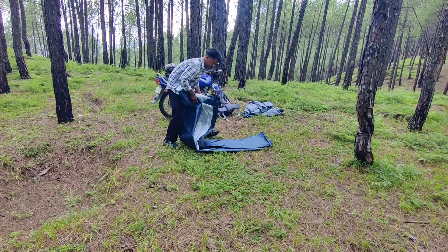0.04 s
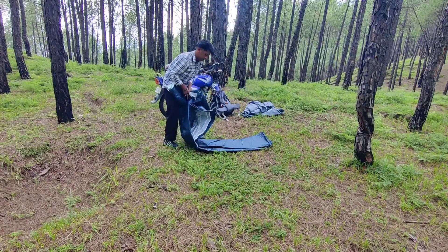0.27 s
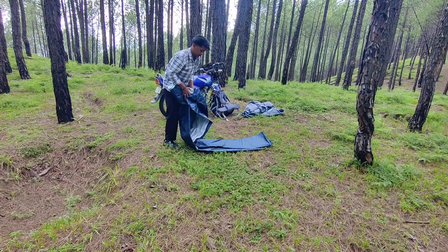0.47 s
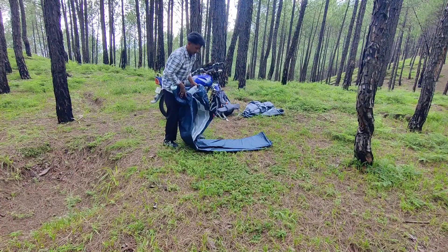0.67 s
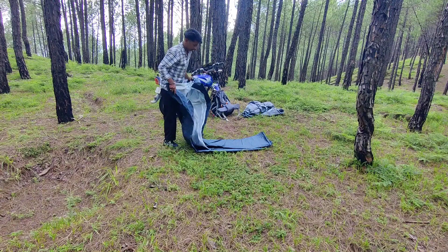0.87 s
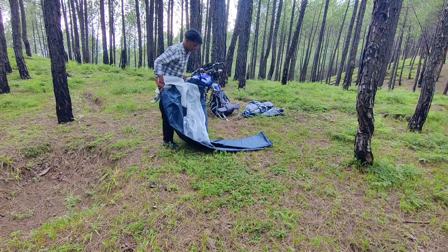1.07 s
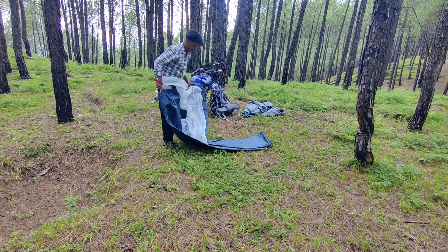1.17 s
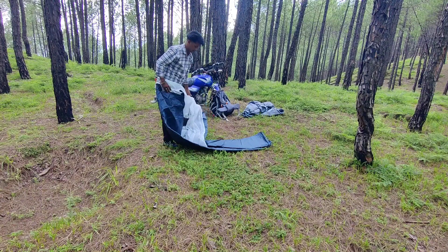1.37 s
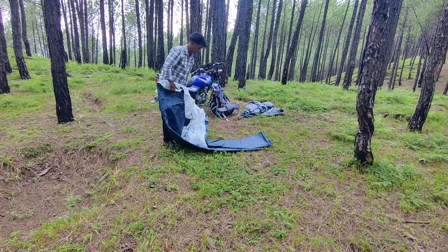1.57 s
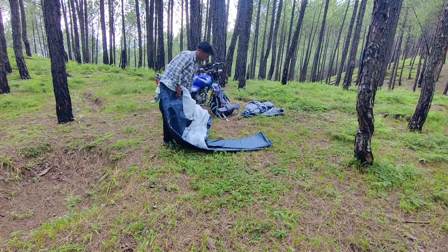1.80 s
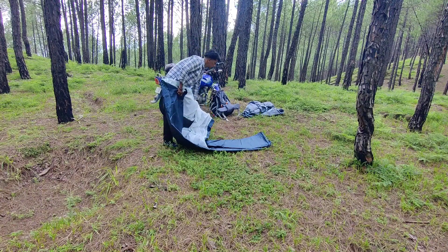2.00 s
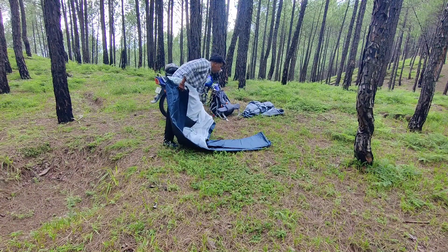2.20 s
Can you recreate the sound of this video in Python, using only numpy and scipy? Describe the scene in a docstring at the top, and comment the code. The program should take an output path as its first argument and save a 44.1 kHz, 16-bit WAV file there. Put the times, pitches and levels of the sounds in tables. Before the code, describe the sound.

Nylon tent fabric rustles faintly for 0.2 s, then pulls taut in a dull, low flap at about 0.25 s. Crumpling, cloth hiss and sharp crease snaps follow, swelling to their fullest around 0.9-1.0 s with low puffs of pushed air. It thins after 1.5 s, nearly silent by 1.7 s, leaving tiny crinkles to the end. Close, slightly left, dry outdoors, with very faint steady woodland air.

```python
"""A nylon tent is lifted and shaken out over grass in a pine wood.
The sheet flaps taut once, then slides and crumples in a long swell and settles into a few small crinkles.
Its folds buckle in dense tiny random clicks, the cloth hisses over itself, and single creases snap.
Its panels push air in low billows of filtered noise; faint steady air among the trees lies behind."""
import sys
import numpy as np
from scipy import signal
from scipy.fft import rfft, irfft, next_fast_len
from scipy.io import wavfile
from scipy.ndimage import map_coordinates

SR = 44100
rng = np.random.default_rng(int(sys.argv[2]) if len(sys.argv) > 2 else 0)


def dump_mix(stems):
    """Bounce the given channels to the path in sys.argv[1] as a 16-bit WAV at rate SR."""
    frames = np.atleast_2d(stems).T  # one column per channel
    limited = np.clip(frames, -1, 1)  # hard clip at full scale
    pcm = np.round(limited * 32767).astype(np.int16)
    wavfile.write(sys.argv[1], SR, pcm)


N = 99225  # length of the scene in samples


def amp(db):
    """Turn decibels into a gain."""
    return 10 ** (np.asarray(db) / 20)


def unit(x):
    """Scale to an rms (average strength) of 1."""
    return x / np.sqrt(np.mean(x ** 2) + 1e-20)


def along(points, hz):
    """Read a (frequency, value) table at any pitch, with straight lines on a log frequency axis."""
    table_hz, values = np.transpose(points)
    return np.interp(np.log(hz + 1), np.log(table_hz + 1), values)


def curve(rows):
    """Read a (time, value) table at every sample."""
    return np.interp(np.arange(N) / SR, *np.transpose(rows))


def wobble(rate):
    """A smooth random curve through rate random points a second."""
    knots = rng.standard_normal(N // 20)
    return map_coordinates(knots, [np.arange(N) * rate / SR], mode="wrap")


def filtered(x, response):
    """Change the strength and timing of each frequency by a complex response."""
    padded = 2 * next_fast_len(N)
    hz = np.fft.rfftfreq(padded, 1 / SR)
    return irfft(rfft(x, padded) * response(hz), padded)[..., :N]


def coloured(x, points):
    """Give a sound a tone colour that never rings ahead of time and keeps the power of white noise."""
    def response(hz):
        # folding the cepstrum forward in time gives the filter its minimum phase
        cepstrum = irfft(np.log(unit(amp(along(points, hz)))))
        half = len(cepstrum) // 2
        cepstrum[1:half] *= 2
        cepstrum[half + 1:] = 0
        return np.exp(rfft(cepstrum))
    return filtered(x, response)


def buckles(per_s, spread_db):
    """Tiny clicks of random time, sign and size; sparse ones are made stronger to keep the power even."""
    chance = np.minimum(per_s / SR, 1)
    size_db = spread_db * np.clip(rng.standard_normal(N), -2, 2)
    sign = np.sign(rng.standard_normal(N))
    clicks = (rng.random(N) < chance) * amp(size_db) * sign
    return unit(clicks / np.sqrt(chance))


SPRAY_S = 0.0023  # the energy of the scatter after each click fades over this time


def sprayed(clicks):
    """Three rows: the clicks, then the noisy spray of reflections after each, for left and right."""
    keep = np.exp(-1 / (SPRAY_S * SR))
    energy = signal.lfilter([1 - keep], [1, -keep], clicks ** 2)
    spray = np.sqrt(np.abs(energy)) * rng.standard_normal((2, N))
    return np.vstack([clicks, spray])


# how hard the cloth is worked: (time [s], level [dB])
HANDLING = [(0, -51.5), (.045, -56), (.08, -56.5), (.11, -59.5), (.14, -58), (.21, -58), (.255, -38),
            (.33, -44), (.425, -47), (.47, -41.5), (.51, -45.5), (.6, -47.5), (.645, -45.5), (.69, -46.5),
            (.735, -43.5), (.78, -42), (.85, -39), (.915, -37.5), (.99, -37.5), (1.1, -40.5), (1.23, -44.5),
            (1.33, -42), (1.41, -47), (1.52, -46.5), (1.57, -53), (1.61, -58.5), (1.68, -66),
            (1.745, -74.5), (1.795, -57.5), (1.88, -71.5), (1.94, -73), (2.05, -63), (2.1, -66.5),
            (2.15, -65.5), (2.19, -62), (2.25, -65.5)]
# cloth sliding over cloth: (time [s], hiss relative to the handling level [dB])
SLIDE = [(0, -13.5), (.3, -15.5), (.5, -12.5), (.65, -17.5), (.8, -18.5), (1, -16.5), (1.2, -17),
         (1.5, -14.5), (1.7, -16), (1.8, -14), (1.9, -13), (2.25, -15)]
# tone colour of the buckling folds: (frequency [Hz], level per Hz [dB])
CLOTH = [(100, -30.5), (280, -9.5), (360, -3), (470, -7.5), (590, -1), (690, 1.5), (820, -3.5), (1150, -4),
         (1500, -4), (1900, -6), (2500, -8.5), (3200, -11.5), (4500, -13), (6500, -15.5), (8000, -34.5),
         (15000, -38.5)]
# tone colour of the sliding hiss: (frequency [Hz], level per Hz [dB])
HISS = [(800, -24), (2500, -22.5), (4000, -21), (6500, -10.5), (7600, 3), (10500, -1), (13000, -3.5),
        (15500, -9)]
# clicks come at the full rate at BUSY_DB, and twice as often for each DOUBLING_DB louder
BUCKLES_PER_S, BUCKLE_SPREAD_DB = 4500, 5
BUSY_DB, DOUBLING_DB = -42, 9
CLUMP_DB, CLUMP_PER_S = 0.5, 200  # size and speed of the random flicker in level


def rustle():
    """Folds buckle in clumps, denser when worked harder, as the cloth hisses; rows as in sprayed."""
    handling_db = curve(HANDLING)
    clump_db = CLUMP_DB * wobble(CLUMP_PER_S)
    density = 2 ** ((handling_db - BUSY_DB) / DOUBLING_DB)
    folds = coloured(sprayed(buckles(BUCKLES_PER_S * density, BUCKLE_SPREAD_DB)), CLOTH)
    hiss = coloured(sprayed(buckles(per_s=12000 * density, spread_db=5.5)), HISS)
    return amp(handling_db + clump_db) * (folds + amp(curve(SLIDE)) * hiss)


# the top starts about here [Hz]; it is turned down AIR_LOSS_DB for each dB of handling under AIR_FULL_DB
AIR_HZ, AIR_LOSS_DB, AIR_FULL_DB = 12900, 2.5, -52


def top_turned_down(x):
    """The sound above about 13 kHz is turned down when the handling level is low."""
    top = filtered(x, lambda hz: 1 - 1 / (1 + (hz / AIR_HZ) ** 20))
    change_db = AIR_LOSS_DB * np.minimum(curve(HANDLING) - AIR_FULL_DB, 0)
    return x + top * (amp(change_db) - 1)


# single creases that snap through:
# (time [s], body level [dB], crackle level [dB], length [s], pitch of the fold [Hz])
SNAPS = [(.001, -52, -77, 0.0073, 730), (0.0663, -52, -73, .005, 1930), (0.076, -51, -77, 0.0051, 1350),
         (0.1216, -52, -65, .003, 1280), (.391, -41, -55, 0.0035, 1090), (0.4567, -34.5, -44, 0.0029, 2510),
         (0.4753, -39.5, -49, 0.0048, 2840), (0.562, -48, -56, 0.0043, 1800),
         (0.609, -49, -46, 0.0045, 1130), (0.639, -45, -44, 0.0037, 596), (0.649, -67, -36, 0.005, 3140),
         (0.7277, -33.5, -51, 0.0021, 1800), (0.7473, -41.5, -67, 0.0099, 1750),
         (0.903, -39.5, -49, .005, 1850), (0.9218, -32.5, -50, 0.0022, 1210),
         (0.9434, -38.5, -41.5, 0.0092, 3250), (0.984, -32.5, -44, 0.0038, 716),
         (1.007, -39, -38, 0.0023, 2100), (1.047, -42.5, -43, 0.0085, 2040),
         (1.121, -39, -45, 0.0034, 1280), (1.253, -45, -46, 0.013, 1210), (1.322, -46, -47.5, .004, 686),
         (1.35, -56, -43, 0.0019, 2110), (1.418, -43.5, -46, 0.002, 2420), (1.456, -70, -45, 0.0024, 1300),
         (1.5617, -47, -44, 0.0018, 1480), (1.569, -61, -45.5, 0.0012, 810),
         (1.763, -66, -59, 0.0057, 1210), (1.783, -59.5, -67, .007, 3770), (1.906, -63, -85, 0.0082, 755),
         (1.954, -57.5, -59, .005, 1460), (1.9955, -57.5, -79, 0.0043, 1550), (2.033, -64, -65, .003, 4340),
         (2.044, -67, -79, 0.0028, 1390), (2.0574, -56, -60, 0.0067, 1200),
         (2.119, -57.5, -83, 0.0022, 1880), (2.169, -60.5, -62.5, 0.0079, 1370)]
# tone colour of the papery body: (frequency [Hz], level per Hz [dB])
SNAP_BODY = [(100, -12), (350, -14.5), (650, 2), (850, -6), (1400, -3), (2500, -6.5), (4000, -12.5),
             (6500, -11.5), (8000, -22), (15000, -47.5)]
# tone colour of the bright crackle: (frequency [Hz], level per Hz [dB])
CRACKLE = [(800, -1), (3000, -2), (5000, 1.5), (6400, 1), (7800, 0), (10300, -5.5), (13000, -14),
           (15500, -5.5)]
SNAP_SWELL = 2.14  # how gradually a run of clicks builds up
FOLD_Q, FOLD_RING_DB = 12, -5  # sharpness of a fold's ring, and its level against the body


def snaps(size=4096):
    """Each crease gives way in a short noisy run: papery body, ring of its fold and bright crackle."""
    body, ring, crackle = np.zeros((3, N + size))
    for start_s, body_db, crackle_db, length_s, fold_hz in SNAPS:
        age = np.arange(size) / SR / length_s  # in snap lengths
        run = rng.standard_normal(size) * (age * np.exp(-2 * age)) ** SNAP_SWELL
        rung = signal.lfilter(*signal.iirpeak(fold_hz, FOLD_Q, SR), run)
        # the level counts over the snap's own length, not the whole block
        scale = np.sqrt(length_s * SR / size)
        at = round(start_s * SR)
        body[at:at + size] += amp(body_db) * scale * unit(run)
        ring[at:at + size] += amp(body_db + FOLD_RING_DB) * scale * unit(rung)
        crackle[at:at + size] += amp(crackle_db) * scale * unit(run)
    return coloured(body[:N], SNAP_BODY) + ring[:N] + coloured(crackle[:N], CRACKLE)


# tone colour of the sheet pulling taut: (frequency [Hz], level per Hz [dB])
TAUT = [(25, 2), (60, -2), (90, -1), (135, 4.5), (220, -6), (320, -20), (450, -12), (650, -2), (850, -8),
        (1400, -10), (2500, -16), (4000, -19), (6500, -26), (9000, -42), (15000, -67)]
# dull tugs as the panels catch the air: (time [s], peak level of the swell [dB])
TUGS = [(.237, -27), (.2625, -34)]
FLAP_S, FLAP_DB = 0.2137, -31.5  # start, and level at full swell
FLAP_ATTACK_S, FLAP_HOLD_S, FLAP_FADE_DB_PER_S = 0.029, 0.031, 244
TUG_HZ, TUG_S = 560, 0.00078  # pitch and rise time of a tug


def flap():
    """The sheet pulls taut in one swelling flurry of clicks, with a couple of soft, quickly fading tugs."""
    now = np.arange(N) / SR
    since = now - FLAP_S
    swell = np.clip(since / FLAP_ATTACK_S, 0, 1) ** 2
    fading_s = np.maximum(since - FLAP_ATTACK_S - FLAP_HOLD_S, 0)
    shape = swell * amp(-FLAP_FADE_DB_PER_S * fading_s)
    out = amp(FLAP_DB) * shape * coloured(buckles(per_s=5000, spread_db=3.5), TAUT)
    for start_s, peak_db in TUGS:
        age = np.maximum(now - start_s, 0)
        pulse = age / TUG_S * np.exp(1 - age / TUG_S)
        out += amp(peak_db) * pulse * np.sin(2 * np.pi * (TUG_HZ * age + rng.random()))
    return out


# air pushed by the swaying panels: (time [s], level [dB])
BILLOW = [(0, -52), (.1, -61.5), (.21, -60.5), (.28, -59), (.39, -40.5), (.44, -50.5), (.48, -44.5),
          (.55, -51), (.66, -46.5), (.76, -52), (.9, -43.5), (1, -46), (1.13, -45.5), (1.35, -47.5),
          (1.5, -52), (1.6, -55), (1.73, -69.5), (1.95, -69.5), (2.25, -72)]
# tone colour of the pushed air: (frequency [Hz], level per Hz [dB])
PANELS = [(20, 1), (45, -1), (80, 0), (110, -1.5), (135, -0.5), (175, 0), (220, -4.5), (300, -13.5),
          (500, -20), (2000, -92)]


def billow():
    """Swaying panels push air in a soft low rumble, made of noise that swells and sinks."""
    return amp(curve(BILLOW)) * unit(coloured(rng.standard_normal(N), PANELS))


def scattered(x, t60, count, size):
    """Fading reflections, size samples long, blending through count random patterns as the sheet moves."""
    place = np.linspace(0, count - 1, N)
    fade = 10 ** (-3 * np.arange(size) / SR / t60)  # falls 60 dB in t60 seconds
    tails = rng.standard_normal((count, 2, size)) * fade
    tails /= np.linalg.norm(tails, axis=2, keepdims=True)
    out = np.zeros((2, N + size))
    for k, tail in enumerate(tails):
        near = np.flatnonzero(np.abs(place - k) < 1)
        piece = x[near] * np.cos(np.pi / 2 * (place[near] - k))
        echo = signal.fftconvolve(piece[None], tail, axes=1)
        out[:, near[0]:near[0] + echo.shape[1]] += echo
    return out[:, :N]


# one soft bounce, heard on the right: delay [s], gain, and where its treble fades [Hz]
GROUND_S, GROUND_GAIN, GROUND_FADE_HZ = 0.001801, 0.2, 3850


def bounced(x):
    """A soft delayed echo off the ground adds to the right side and combs its tone."""
    def echo(hz):
        delay = np.exp(-2j * np.pi * hz * GROUND_S)
        less_treble = 1 / (1 + (hz / GROUND_FADE_HZ) ** 4)
        less_bass = hz / (hz + 200)
        return GROUND_GAIN * delay * less_treble * less_bass
    return x + filtered(x, echo) * np.array([[0], [1]])


# tone colour of the still air among the trees: (frequency [Hz], level per Hz [dB])
WOODS = [(20, 2), (70, 6.5), (150, -20), (300, -31), (650, -17), (1000, -7), (2500, -18), (6000, -31.5),
         (10000, -27), (15000, -64)]
WOODS_DB, WOODS_WIDE_HZ = -70, 700  # level, and the pitch around which left and right grow apart


def woods():
    """Faint steady air among the trees is filtered noise, alike on both sides in the bass."""
    mid, side = coloured(rng.standard_normal((2, N)), WOODS)
    side = filtered(side, lambda hz: hz / (hz + WOODS_WIDE_HZ))
    return amp(WOODS_DB) * unit(np.array([mid + side, mid - side]))


# share of the sound's power that arrives straight: (frequency [Hz], share [0-1])
DIRECT = [(30, 0.82), (130, 1), (300, 0.95), (640, 0.86), (1400, 0.75), (3000, 0.83), (7000, 0.26),
          (15000, 0.27)]
LEAD_S = 7.5e-5  # the left microphone hears the tent this much sooner
SCATTER_T60_S, TRUNKS_T60_S, TRUNKS_DB = 0.018, 0.24, -9  # fade times, and level of the trunks' answer


def scene():
    """The tent a little to the left: straight sound, near scatter and a faint answer from the trunks."""
    cloth = top_turned_down(rustle())
    moves = top_turned_down(snaps()) + billow() + flap()
    tent = cloth[0] + moves

    def share(hz):
        """Power share of the straight sound; the rest is scattered."""
        return np.clip(along(DIRECT, hz), 0, 1)

    def straight_path(hz):
        """Half the lead moves the left side earlier, half moves the right side later."""
        lead = np.exp(1j * np.pi * hz * LEAD_S * np.array([[1], [-1]]))
        return np.sqrt(share(hz)) * lead

    straight = filtered(tent, straight_path)
    near = cloth[1:] + scattered(moves, SCATTER_T60_S, count=260, size=1500)
    trunks = scattered(tent, TRUNKS_T60_S, count=30, size=16000)
    around = filtered(near + amp(TRUNKS_DB) * trunks, lambda hz: np.sqrt(1 - share(hz)))
    return bounced(straight + around) + woods()


# tone of the microphones in their housing: (frequency [Hz], level [dB])
HOUSING = [(1500, 0), (1680, -5), (1820, 1), (2120, 1), (2260, -3.5), (2520, 2.5), (2750, -2.5), (3000, 2),
           (3350, -1.5), (3850, 1), (4300, -1)]
# how the two microphones differ: (frequency [Hz], left minus right level [dB])
TILT = [(3400, 0), (4500, 2), (6400, 2), (7200, -3.4), (9000, -1.5), (9600, 0.5)]
TOP_HZ = 15750  # nothing is heard above this pitch


def record(dry):
    """Each microphone has its own tone; the sound stops above TOP_HZ."""
    def tone(hz):
        tilt_db = along(TILT, hz) * np.array([[.5], [-.5]])
        return amp(along(HOUSING, hz) + tilt_db)
    return filtered(dry, lambda hz: tone(hz) * (hz < TOP_HZ))


dry = scene()
out = record(dry)
dump_mix(out)
```